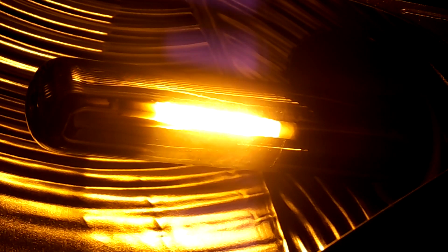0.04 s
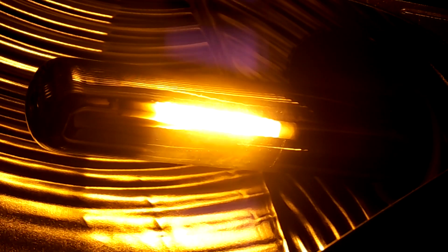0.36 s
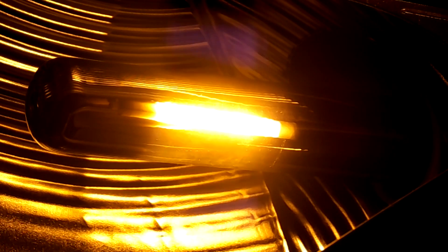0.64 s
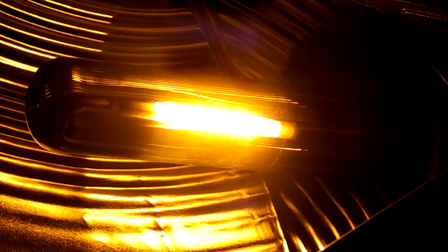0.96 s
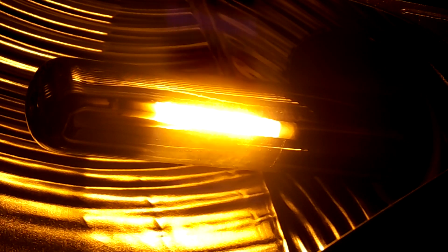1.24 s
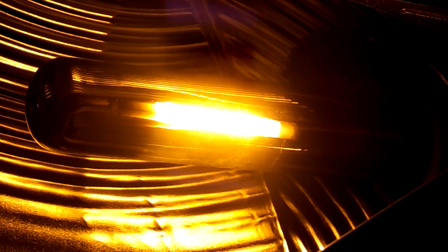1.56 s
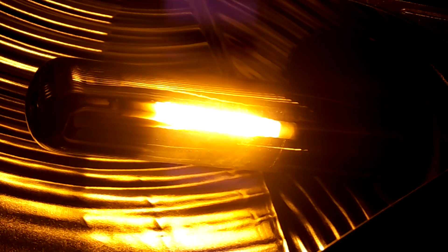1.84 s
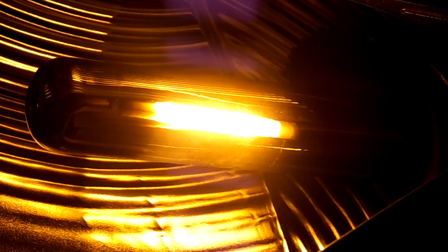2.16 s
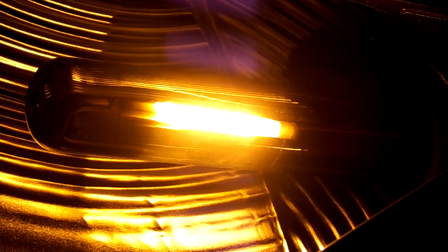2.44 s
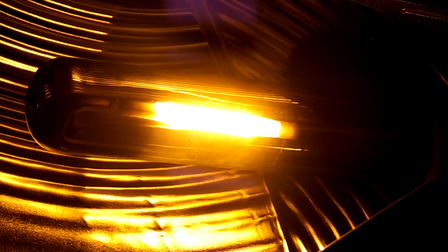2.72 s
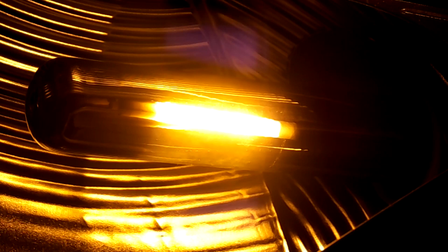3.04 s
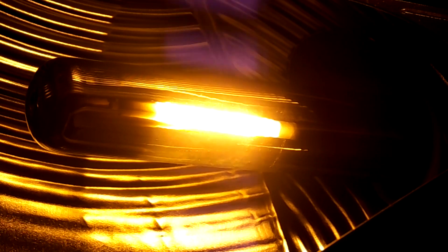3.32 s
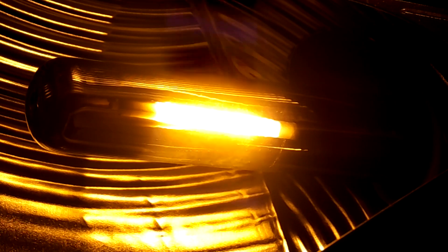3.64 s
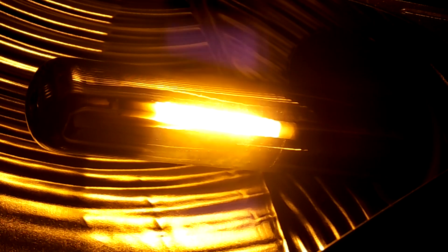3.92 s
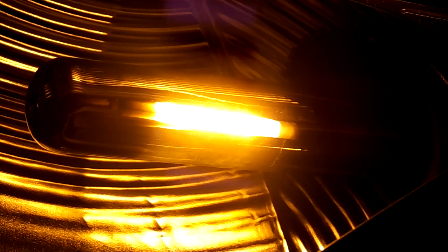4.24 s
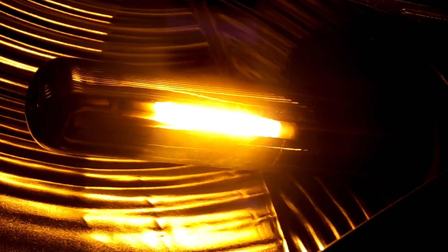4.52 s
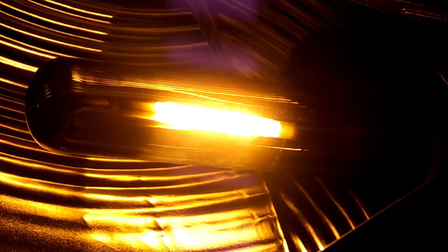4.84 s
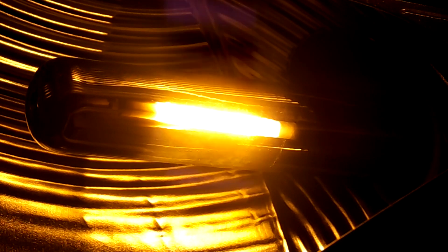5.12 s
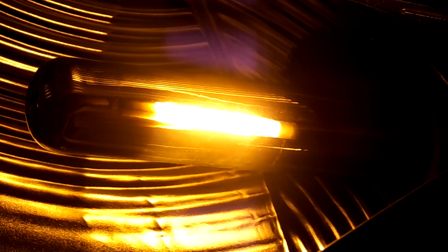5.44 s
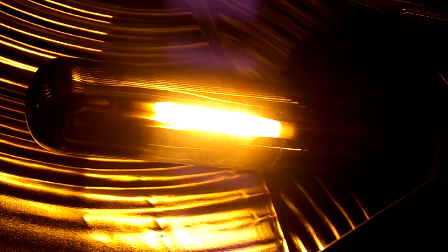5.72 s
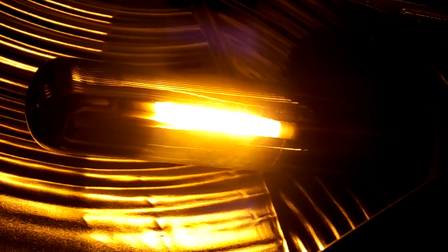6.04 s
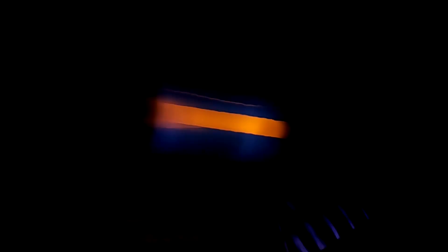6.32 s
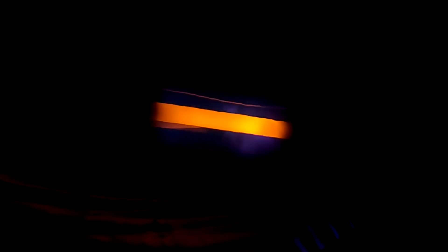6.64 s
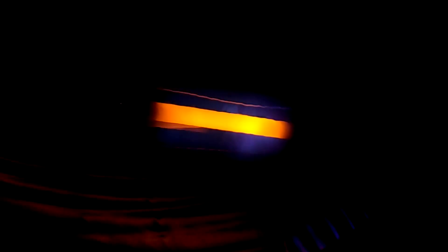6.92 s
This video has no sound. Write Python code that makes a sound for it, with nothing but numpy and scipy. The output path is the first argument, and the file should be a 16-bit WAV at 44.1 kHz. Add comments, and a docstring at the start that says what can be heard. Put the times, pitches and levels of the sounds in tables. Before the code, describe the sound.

A lamp hums faintly under a soft, steady hiss of air for about six seconds. Suddenly it falters: its metal housing gives a loud buzzing rattle in three quick bouts, with low thumps, an electrical growl and a faint sizzle. After half a second the rattle stops and the metal rings briefly, leaving a quieter, thin buzz. The microphone is close, in still surroundings.

```python
"""Failing sodium street lamp

A worn lamp hums faintly in still night air, close by and in mono. Its arc falters and conducts
one way only: the ballast growls at the mains rate, thumps the lamp head and rattles the housing
in three bouts. The arc whistles, sizzles and goes out, the housing rings down, and the igniter
keeps buzzing."""
import sys
import numpy as np
from scipy import signal
from scipy.fft import rfft, irfft, next_fast_len
from scipy.io import wavfile
from scipy.ndimage import map_coordinates

SR = 44100
rng = np.random.default_rng(int(sys.argv[2]) if len(sys.argv) > 2 else 0)


def file_out(sig):
    """Save sig as 16-bit WAV at sys.argv[1]."""
    # one column per channel
    cols = np.atleast_2d(sig).T
    # limit, then scale
    lim = np.clip(cols, -1, 1)
    pcm = np.round(lim * 32767).astype(np.int16)
    wavfile.write(sys.argv[1], SR, pcm)


N = 307377
MAINS_HZ = 50.1


def amp(db):
    """Decibels to gain."""
    return 10 ** (np.asarray(db) / 20)


def unit(x):
    """Scale to rms 1."""
    return x / np.sqrt(np.mean(x ** 2) + 1e-20)


def along(points, hz):
    """Interpolate (f/Hz, value) points on a log frequency axis."""
    f, value = np.transpose(points)
    return np.interp(np.log(hz + 1), np.log(f + 1), value)


def clock():
    """Time of every sample in s."""
    return np.arange(N) / SR


def wobble(rate_hz):
    """Smooth random curve, rate_hz knots a second."""
    return map_coordinates(rng.standard_normal(int(N * rate_hz / SR) + 4), [clock() * rate_hz])


def tone(hz, wander_hz, rate_hz):
    """Sine of rms 1 with wandering pitch."""
    cycles = np.cumsum(hz + wander_hz * wobble(rate_hz)) / SR
    return np.sqrt(2) * np.sin(2 * np.pi * (cycles + rng.random()))


def envelope(start_s, length_s, attack_s, swell_db_per_s=0, fall_db_per_s=0):
    """Rounded attack, swelling or sagging hold, exponential release."""
    age = np.maximum(clock() - start_s, 0)
    db = swell_db_per_s * np.minimum(age, length_s) - fall_db_per_s * np.maximum(age - length_s, 0)
    return (1 - np.exp(-(age / attack_s) ** 2)) * amp(db)


def coloured(x, gain):
    """Minimum-phase filter with magnitude gain(hz)."""
    size = 2 * next_fast_len(N // 2 + SR // 4)
    magnitude = np.maximum(gain(np.fft.rfftfreq(size, 1 / SR)), 1e-6)
    cepstrum = irfft(np.log(magnitude))
    cepstrum[1:size // 2] *= 2
    cepstrum[size // 2 + 1:] = 0
    return irfft(rfft(x, size) * np.exp(rfft(cepstrum)), size)[:N]


def body(spectrum, modes):
    """Gain curve of resonances on a broad spectrum."""
    def gain(hz):
        peaks = sum(amp(2 * db) / (1 + ((hz - f) / width) ** 2) ** 2 for f, width, db in modes)
        return np.sqrt(amp(2 * along(spectrum, hz)) + peaks)
    return gain


# Air spectrum: f/Hz, relative density/dB
AIR_SPECTRUM = [(12, -47), (20, -23.5), (27, -24.5), (167, -7), (197, -8), (233, -6.5), (442, -9.5),
                (494, -7), (751, -12.5), (888, -12.5), (1730, -17), (6080, -22.5), (8740, -23),
                (14400, -25), (15700, -27.5)]
# Soft sizzle band: f/Hz, half-width/Hz, relative level/dB
AIR_SIZZLE = [(8675.3, 830, -25)]
# Background tones: f/Hz, wander/Hz, level/dB
NIGHT_TONES = [(579, 2.95, -74), (7020, 3.6, -90), (8085.6, 5, -91), (8590, 4.4, -81), (14200, 11, -101),
               (14100, 8.7, -95)]


def night(air_db=-59):
    """Steady distant air and hiss, with a few thin tones."""
    air = unit(coloured(rng.standard_normal(N), body(AIR_SPECTRUM, AIR_SIZZLE)))
    whine = sum(amp(db) * tone(hz, wander, rate_hz=15) for hz, wander, db in NIGHT_TONES)
    return amp(air_db) * air + whine


def mains_harmonics(harmonics, waver_db, rate_hz):
    """Mains harmonics, each wavering in level on its own."""
    phase = 2 * np.pi * MAINS_HZ * clock()
    out = np.zeros(N)
    for order, db in harmonics:
        rms = amp(db + waver_db * wobble(rate_hz))
        out += rms * np.sqrt(2) * np.sin(order * phase + 2 * np.pi * rng.random())
    return out


# Ballast, steady arc: mains harmonic, relative level/dB
HUM_HARMONICS = [(1, -87.5), (4, -66), (6, -79), (8, -81.5), (10, -76), (16, -81), (18, -79), (20, -89)]


def ballast_hum(start_db=2, fall_db_per_s=0.93):
    """The iron core hums mostly on even harmonics, fading steadily."""
    fade = amp(start_db - fall_db_per_s * clock())
    return fade * mains_harmonics(HUM_HARMONICS, waver_db=0.75, rate_hz=3.5)


def fault(start_s=6.291, end_s=6.775):
    """Strength of the one-way current; drives growl and whistles."""
    return envelope(start_s, end_s - start_s, attack_s=0.006, swell_db_per_s=5, fall_db_per_s=900)


# Ballast, one-way arc: mains harmonic, relative level/dB
GROWL_HARMONICS = [(2, -76), (3, -63), (4, -54), (5, -59), (6, -60), (7, -53), (10, -60), (13, -65),
                   (16, -51), (17, -56), (25, -60), (30, -67)]


def ballast_growl(gain_db=-2.2):
    """One-way current adds strong odd harmonics in the core."""
    return amp(gain_db) * fault() * mains_harmonics(GROWL_HARMONICS, waver_db=3, rate_hz=28)


# Discharge whistles: f/Hz, wander/Hz, relative level/dB, flicker/dB
ARC_WHISTLES = [(4570, 70, -66.5, 4), (10600, 80, -75.5, 4)]
# Squeals: centre t/s, length/s, level/dB
ARC_SQUEALS = [(6.395, .015, -66), (6.415, .012, -64), (6.452, .012, -64), (6.534, .012, -60),
               (6.555, .015, -66), (6.736, .014, -59)]


def arc_whistles(squeal_hz=13900):
    """The faulty discharge whistles unsteadily and squeals in short spurts."""
    whistles = np.zeros(N)
    for hz, wander_hz, db, flicker_db in ARC_WHISTLES:
        whistles += amp(db + flicker_db * np.tanh(wobble(35))) * tone(hz, wander_hz, rate_hz=300)
    spurts = sum(amp(db) * np.exp(-2 * ((clock() - s) / length) ** 2) for s, length, db in ARC_SQUEALS)
    return fault() * whistles + spurts * tone(squeal_hz, wander_hz=150, rate_hz=500)


# Rattle bouts: t/s, length/s, relative level/dB, attack/s, swell/(dB/s)
SHAKE_BOUTS = [(6.307, .05, -37.2, .002, -35), (6.383, 0.075, -38, 0.011, 14),
               (6.502, 0.23, -41, 0.0073, 11)]


def shaking(fall_db_per_s=340):
    """How hard the housing shakes; drives rattle, reflector and sputter."""
    return sum(amp(db) * envelope(start, length, attack, swell, fall_db_per_s)
               for start, length, db, attack, swell in SHAKE_BOUTS)


def contacts(sync_s, jitter_s, scatter_db, slope_db_per_cycle, count):
    """One slap per mains cycle, then weaker bounces in a loosely repeating pattern."""
    starts = sync_s % (1 / MAINS_HZ) + np.arange(int(N / SR * MAINS_HZ) + 1) / MAINS_HZ
    place = (np.arange(count) + np.r_[0, rng.uniform(-0.5, 0.5, count - 1)]) / count
    shape = (len(starts), count)
    slip = jitter_s * rng.standard_normal(shape) ** 3  # most on time, a few far off
    times = starts[:, None] + place / MAINS_HZ + slip
    sizes = amp(slope_db_per_cycle * place + scatter_db * rng.standard_normal(shape))
    sizes *= rng.choice([-1, 1], count)
    sizes /= np.linalg.norm(sizes, axis=1, keepdims=True)  # equal energy per cycle
    samples = np.abs(times * SR).astype(int)
    return unit(np.bincount(samples.ravel(), sizes.ravel(), N)[:N])


# Housing ring time: f/Hz, t60/s
HOUSING_T60 = [(200, 0.53), (1400, 0.42), (3000, 0.3266), (10000, 0.1437)]


def housing_ring(x, tail_db):
    """Sheet metal rings on after each contact; the treble dies first."""
    hz, t, noise = signal.stft(rng.standard_normal(SR // 2), SR, nperseg=256)
    decay = amp(-60 * t / along(HOUSING_T60, hz)[:, None])
    decay /= np.linalg.norm(decay, axis=1, keepdims=True)
    tail = unit(signal.istft(noise * decay, SR, nperseg=256)[1])
    ringing = signal.fftconvolve(x, tail / np.sqrt(len(tail)))[:N]
    return (x + amp(tail_db) * ringing) / np.hypot(1, amp(tail_db))


# Housing and reflector resonances: f/Hz, half-width/Hz, relative level/dB
HOUSING_MODES = [(806, 28, -6), (1130, 21.8, -6), (1270, 72, -3.5), (1503, 54, 3.5), (1956, 48, -3.5),
                 (2230, 52, -9), (2430, 30.17, -13), (2648.3, 27.08, -14), (2839.6, 77.5, -20),
                 (2940, 39, -10.5), (3324, 110, -12), (3900, 45, -17), (4090, 75, -13.5),
                 (4525, 44.56, -16), (5490, 100, -19.5), (6610, 88, -21.5), (10566, 42.84, -25),
                 (13900, 130, -35)]
# Their dense weaker modes: f/Hz, relative density/dB
PANEL_SPECTRUM = [(60, -44), (170, -18.5), (330, -5.5), (430, -13.5), (700, -10), (980, -9.5), (1400, -16),
                  (1800, -6.5), (2120, -16), (3200, -15.5), (5000, -25.5), (6600, -27.5), (7600, -32),
                  (15500, -41)]


def rattle(gain_db=-0.7):
    """The shaken housing chatters against its seat."""
    blows = contacts(sync_s=6.3102, jitter_s=0.0002, scatter_db=1.5, slope_db_per_cycle=-12, count=40)
    metal = unit(coloured(blows, body(PANEL_SPECTRUM, HOUSING_MODES)))
    return amp(gain_db) * housing_ring(shaking() * metal, tail_db=-3.5)


# Lightly damped reflector modes: f/Hz, level re shaking/dB, t60/s
REFLECTOR_MODES = [(1122, -13.5, 0.3), (1273, -11.5, 0.53), (1325, -10.5, .15), (1480, -17, 0.3604),
                   (1510, -18, 0.153), (1920, -19, 0.94), (1953, -17.5, 0.27), (2620, -21, 0.131),
                   (2754, -19, 0.1602), (2985.5, -26, 0.1375)]


def reflector(waver_db=2):
    """Each mode stores energy from the shaking and releases it at its own rate."""
    power, out = shaking() ** 2, np.zeros(N)
    for hz, db, t60 in REFLECTOR_MODES:
        retained = amp(-60 / (t60 * SR)) ** 2
        stored = signal.lfilter([1 - retained], [1, -retained], power)
        out += amp(db + waver_db * wobble(25)) * np.sqrt(stored) * tone(hz, wander_hz=3.8, rate_hz=30)
    return out


def arc_sizzle(sputter_db=-25.5, flare_db=-48, highpass_hz=6000, spiky_db=3, throb_db=1.5):
    """The arc sputters with the shaking and flares once, strongest on the conducting half cycle."""
    current = np.cos(2 * np.pi * MAINS_HZ * (clock() - 6.6135))  # crest at 6.6135 s
    sparks = rng.standard_normal(N) * amp(spiky_db * wobble(900) + throb_db * current)
    sizzle = unit(coloured(sparks, lambda hz: hz ** 2 / (hz ** 2 + highpass_hz ** 2)))
    flare = envelope(start_s=6.583, length_s=0.027, attack_s=0.0093, fall_db_per_s=240)
    return (amp(sputter_db) * shaking() + amp(flare_db) * flare) * sizzle


# Current surges: t/s, relative level/dB
SURGES = [(6.308, -48.5), (6.342, -39.5), (6.381, -39.5), (6.473, -39), (6.499, -40), (6.68, -44.5),
          (6.757, -36.5)]
# Low lamp head modes: f/Hz, relative level/dB, t60/s
HEAD_MODES = [(172, -6, 0.16), (201.6, 4, 0.12), (238, -4, 0.095), (318, -4.5, 0.11)]


def head_thumps(rise_s=0.01):
    """Each surge gives the lamp head a soft magnetic shove that excites its low modes."""
    out, t = np.zeros(N + SR), np.arange(SR // 2) / SR
    onset = 1 - np.exp(-(t / rise_s) ** 2)
    for start_s, surge_db in SURGES:
        swing = sum(amp(db - 60 * t / t60) * np.sin(2 * np.pi * (hz * t + rng.random()))
                    for hz, db, t60 in HEAD_MODES)
        out[round(start_s * SR):][:len(t)] += amp(surge_db) * swing * onset
    return out[:N]


def firing():
    """Igniter strength: starts as the arc fails, then slowly weakens."""
    return envelope(start_s=6.745, length_s=N / SR, attack_s=0.02, swell_db_per_s=-8)


# Ballast, igniter firing: mains harmonic, relative level/dB
IDLE_HARMONICS = [(1, -81), (2, -76.5), (3, -68), (4, -61), (5, -70.5), (6, -64), (7, -64), (8, -66),
                  (9, -68), (10, -68.5), (11, -68), (12, -70), (16, -64.5), (17, -64.5)]


def ballast_idle():
    """The core hums on odd and even harmonics while the igniter fires."""
    return firing() * mains_harmonics(IDLE_HARMONICS, waver_db=3.5, rate_hz=27)


# Igniter tick spectrum: f/Hz, relative density/dB
TICK_SPECTRUM = [(200, -11), (700, 0), (1300, -7), (2500, -9), (4000, -10.5), (5700, -10), (7000, -18),
                 (15500, -22)]
# Tick resonances: f/Hz, half-width/Hz, relative level/dB
TICK_RESONANCES = [(3429, 60, -6), (3912, 55, -4), (5660, 44.2, -4.5), (7139, 60, -9), (7901.3, 60, -9),
                   (10600, 87.5, -13.5), (13950, 200, -12)]


def igniter(buzz_db=-56, coil_hz=5066, coil_db=-66):
    """Mains-locked ticks make a thin, even buzz; the coil sings faintly."""
    ticks = contacts(sync_s=6.78, jitter_s=0.0001, scatter_db=2.5, slope_db_per_cycle=-7, count=24)
    buzz = unit(coloured(ticks, body(TICK_SPECTRUM, TICK_RESONANCES)))
    coil = tone(coil_hz, wander_hz=5.9, rate_hz=40)
    return firing() * (amp(buzz_db) * buzz + amp(coil_db) * coil)


def scene():
    """Night air and lamp, identical on both channels."""
    air = night()
    ballast = ballast_hum() + ballast_growl() + ballast_idle()
    housing = head_thumps() + rattle() + reflector()
    arc = arc_sizzle() + arc_whistles()
    mono = air + ballast + housing + arc + igniter()
    return np.array([mono, mono])


def record(dry, cutoff_hz=15800):
    """Brick-wall low-pass."""
    size = next_fast_len(N + SR // 2)
    passband = np.fft.rfftfreq(size, 1 / SR) < cutoff_hz
    return irfft(rfft(dry, size) * passband, size)[:, :N]


dry = scene()
out = record(dry)
file_out(out)
```